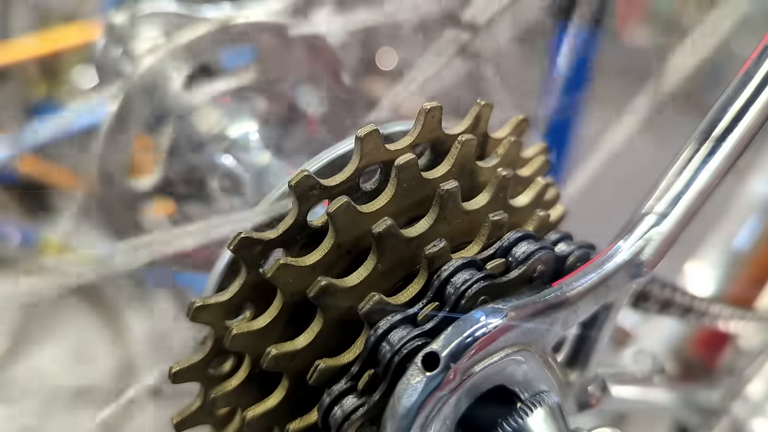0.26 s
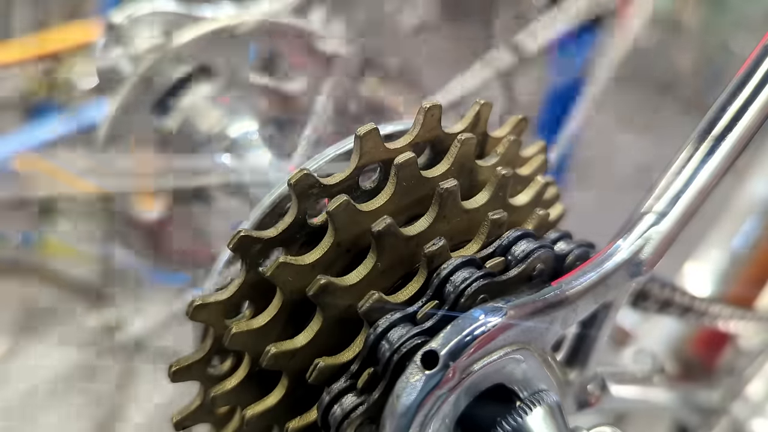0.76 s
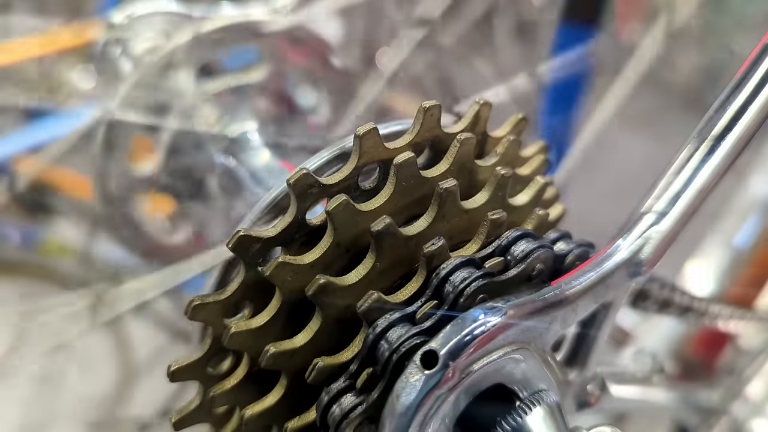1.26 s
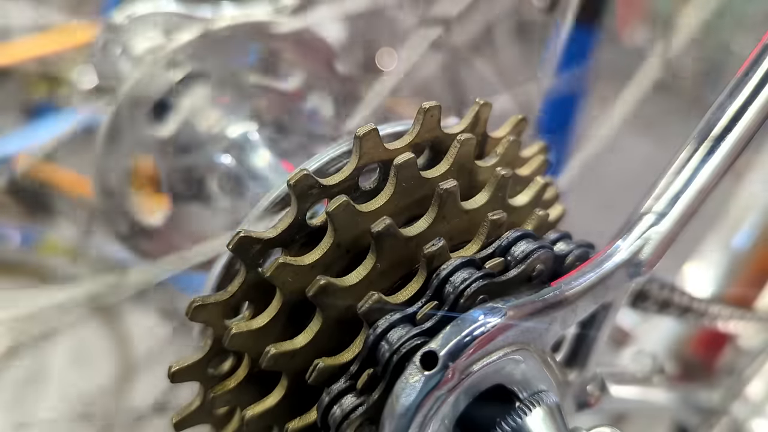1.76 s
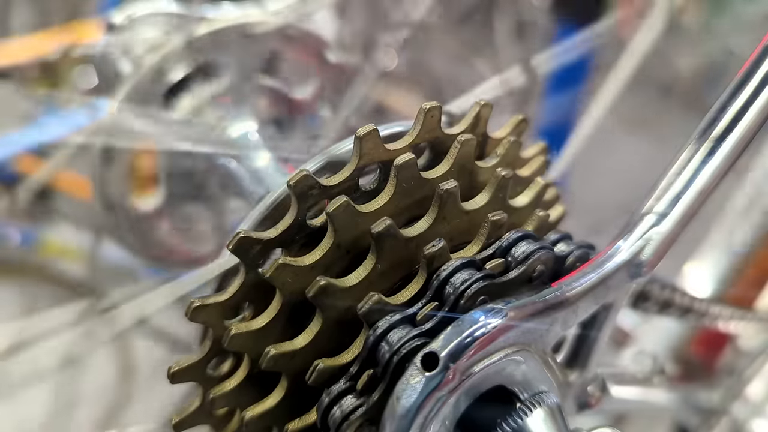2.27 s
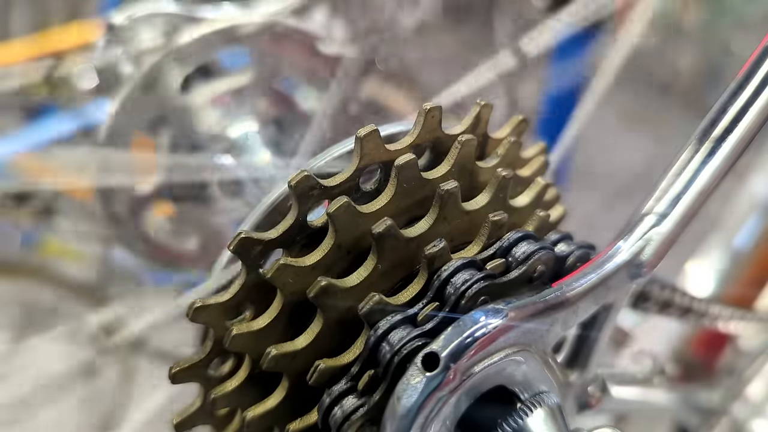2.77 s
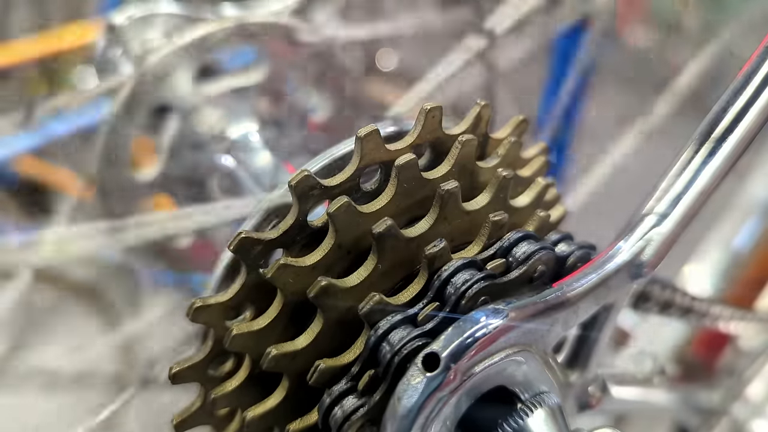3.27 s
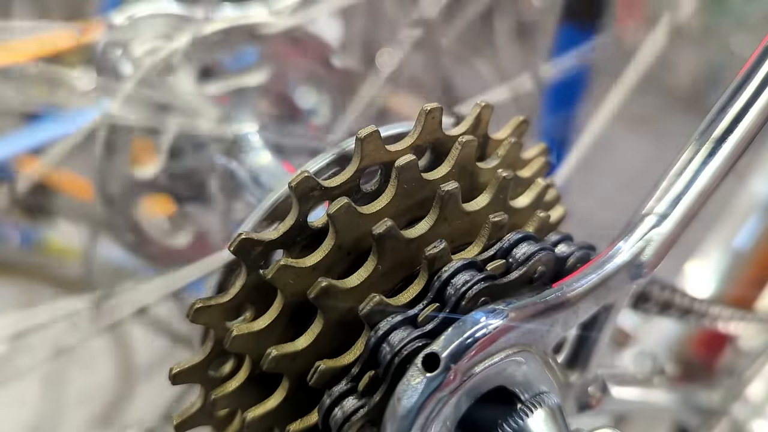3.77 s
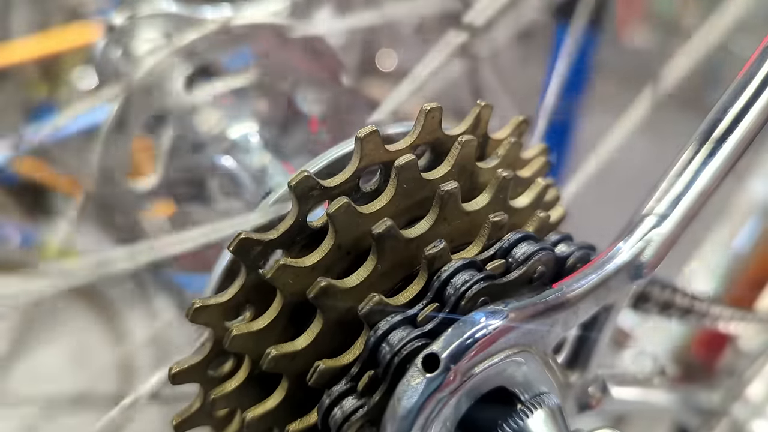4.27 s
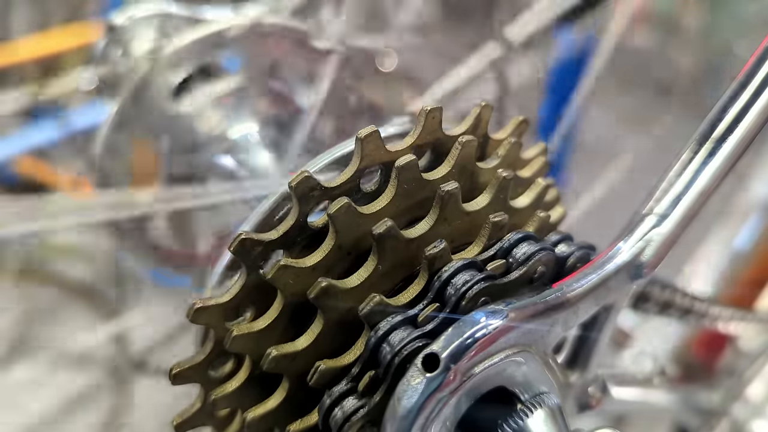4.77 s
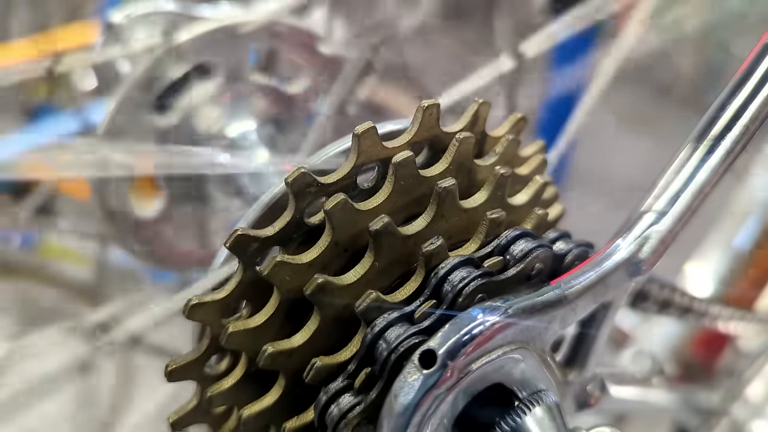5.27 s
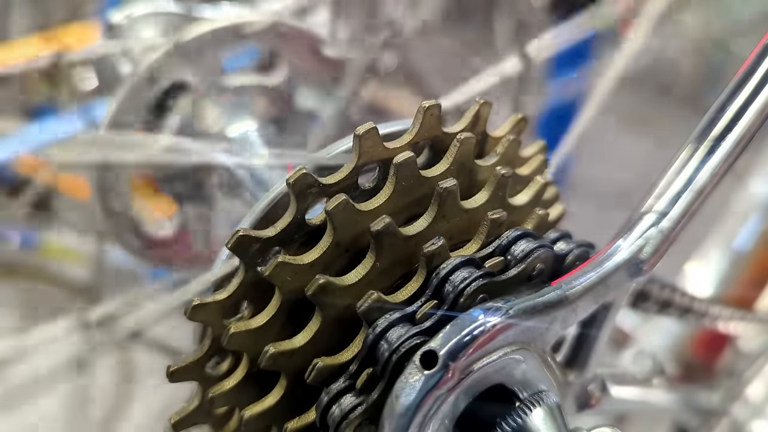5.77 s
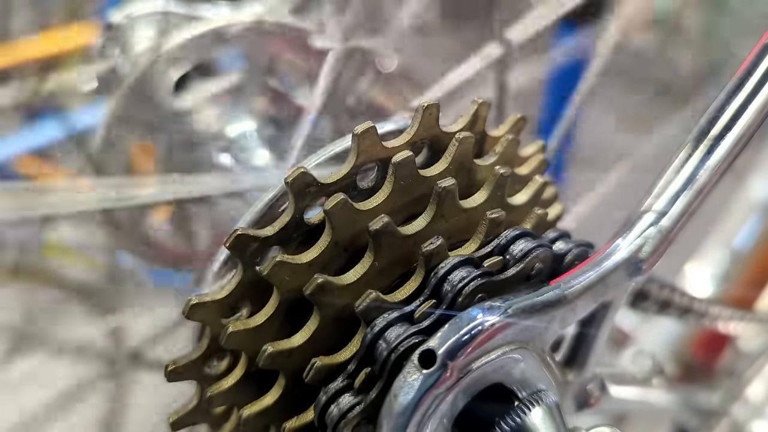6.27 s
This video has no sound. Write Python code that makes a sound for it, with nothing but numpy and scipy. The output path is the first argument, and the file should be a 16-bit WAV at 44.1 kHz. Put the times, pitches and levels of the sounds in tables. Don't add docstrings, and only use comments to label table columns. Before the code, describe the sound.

Close, crisp ratchet clicks from a coasting bike wheel run together in a steel buzz, slowing steadily above quiet workshop air.

```python
import sys
import numpy as np
from scipy import signal
from scipy.fft import rfft, irfft, next_fast_len
from scipy.io import wavfile
from scipy.ndimage import uniform_filter1d, map_coordinates

SR = 44100
rng = np.random.default_rng(int(sys.argv[2]) if len(sys.argv) > 2 else 0)


def output_pcm(signal):
    pcm = np.clip(np.atleast_2d(signal).T, -1, 1) * 32767
    wavfile.write(sys.argv[1], SR, np.round(pcm).astype(np.int16))


def natural_amplitude(level_db):
    exponent = np.asarray(level_db, float) / 20
    return 10 ** exponent


N = 287179
TEETH = 21
# (frequency [Hz], left-right correlation [1])
PORT_LIKENESS = [(60, 0.63), (300, 0.99), (500, 0.034), (5000, 0.06)]


def unit(x):
    return x / np.sqrt(np.mean(x ** 2) + 1e-20)


def along(points, hz):
    point_hz, value = np.transpose(points)
    return np.interp(np.log(hz + 1), np.log(point_hz + 1), value)


def spectrum(points):
    return lambda hz: natural_amplitude(along(points, hz))


def filtered(x, response):
    m = next_fast_len(N + SR // 2)
    return irfft(rfft(x, m) * response(np.fft.rfftfreq(m, 1 / SR)), m)[..., :N]


def resonance(hz, centre_hz, width_hz):
    return 1j * hz * width_hz / (centre_hz ** 2 - hz ** 2 + 1j * hz * width_hz)


def rush(response, likeness, patchy_db, window=512):
    z = signal.stft(rng.standard_normal((2, N)), nperseg=window)[2]
    patches = uniform_filter1d(rng.standard_normal(z.shape[1:]), 4, 0)
    patches = unit(uniform_filter1d(patches, 3, 1))
    pair = signal.istft(z * natural_amplitude(patchy_db * patches), nperseg=window)[1][:, :N]

    def mid_side(hz):
        turn = np.arccos(np.clip(along(likeness, hz), -1, 1)) / 2
        return response(hz) * np.array([np.cos(turn), np.sin(turn)])

    mid, side = filtered(pair, mid_side)
    return unit(np.array([mid + side, mid - side]))


def room_air():
    # (frequency [Hz], level [dB])
    air_points = [(15, -60), (38, -24), (55, -12), (180, -15), (400, -10), (700, -7.5), (1000, -8.5),
                  (2000, -16), (5000, -4.5), (11000, -120)]
    return rush(spectrum(air_points), PORT_LIKENESS, patchy_db=.4, window=1024)


def wheel_whir():
    # (frequency [Hz], width [Hz], level [dB])
    whir_modes = [(134, 7.3, -10.5), (220, 15, -17), (282, 33, -9), (676, 37, -6), (815, 86, 2.3),
                  (1584, 145, -5), (2035, 63, -1.5)]

    def response(hz):
        return sum(natural_amplitude(db) * abs(resonance(hz, c, w)) ** 2 for c, w, db in whir_modes)

    return natural_amplitude([[1.2], [-1.2]]) * rush(response, PORT_LIKENESS, patchy_db=1.8, window=2048)


def low_hum(t):
    # (time [s], level [dB])
    hum_levels = [(0.0, -81), (0.42, -64), (0.65, -82), (0.76, -65), (0.92, -79), (1.57, -63), (1.66, -87),
                  (1.94, -69.5), (2.9, -78), (3.46, -67), (3.95, -79), (4.04, -75), (5.76, -77),
                  (6.08, -60.5), (6.5, -61)]
    drift_rad = 0.55 * map_coordinates(rng.standard_normal(40), [4 * t])
    level_db = np.interp(t, *np.transpose(hum_levels)) - 1.0
    return natural_amplitude(level_db) * np.sin(2 * np.pi * 77.7 * t + drift_rad)


def workshop():
    # (time [s], air level [dB], whir level [dB])
    background = [
        (0.0, -78, -57),
        (0.03, -62, -56.5),
        (1.32, -62.5, -60),
        (6.03, -67, -63),
        (6.41, -67, -68),
        (6.501, -60.5, -67),
    ]
    t = np.arange(N) / SR
    s, air_db, whir_db = np.transpose(background)
    air = natural_amplitude(np.interp(t, s, air_db) + 10.5) * room_air()
    whir = natural_amplitude(np.interp(t, s, whir_db) + 4.5) * wheel_whir()
    return air + whir + low_hum(t)


def landings():
    # (time [s], rate [teeth/s])
    tooth_rate = [(0, 26.083), (.59, 25.046), (1.19, 24.438), (1.78, 23.3), (2.37, 22.647), (2.96, 21.921),
                  (3.56, 21.128), (4.15, 20.531), (4.74, 19.696), (5.33, 19.1), (5.93, 18.371),
                  (6.52, 17.857)]
    # (hard blow [dB], its bounces [dB], flat blow [dB], its bounces [dB])
    tooth_wear = [(-1.6, 5, 3, -6), (-0.1, 3.5, 1.4, -2), (-2.5, 5.5, 0, 1), (-1.8, 6.8, 1.2, -1),
                  (-3.1, 8.5, 0.2, 0.5), (-2.5, 8, 0.1, 0.5), (-0.8, 5.5, 0.4, -1), (2, -1, 1.9, -4),
                  (1.6, -1, -3, 4.5), (-2, -1, 2, -3), (0.3, -.7, 1.5, -1), (.7, -1, -0.7, 1.9),
                  (-1.5, 3, -0.7, 0), (-2.4, 6.5, -0.6, .5), (0.9, 1.2, 0.2, -3.5), (-0.4, 5.5, 0.3, -6.5),
                  (0.2, 3.7, 2, -2.5), (-0.7, 6.5, 0, 2.2), (-.2, 1, 0.8, -4), (0.7, 3, -0.5, -6),
                  (-1, 3.5, 2, -3.2)]
    start_tooth, seat_gap_teeth, gap_growth = .0455, .61, .00007
    graze_lead_s, jitter_s = .0008, .0002
    hard_db, hard_bounce_db, hard_delay_s = -19.5, -7, .0006
    flat_db, flat_bounce_db, flat_delay_s = -21.5, -2.1, .0017
    blow_scatter_db, bounce_scatter_db = 0.32, 1.82

    t = np.arange(N) / SR
    passed = start_tooth + np.cumsum(np.interp(t, *np.transpose(tooth_rate))) / SR
    tooth, flat = np.divmod(np.arange(2 * int(passed[-1]) + 1), 2)
    luck = rng.standard_normal((len(tooth), 3))
    seat = tooth + flat * (seat_gap_teeth + gap_growth * tooth)
    s = np.interp(seat, passed, t) - graze_lead_s + jitter_s * luck[:, 0]
    wear = np.array(tooth_wear)[tooth % TEETH]
    blow_db = np.where(flat, flat_db + wear[:, 2], hard_db + wear[:, 0])
    blow_db = blow_db + blow_scatter_db * luck[:, 1]
    bounce_db = np.where(flat, flat_bounce_db + wear[:, 3], hard_bounce_db + wear[:, 1])
    bounce_db = bounce_db + bounce_scatter_db * luck[:, 2]
    delay_s = np.where(flat, flat_delay_s, hard_delay_s)
    return np.array([s, blow_db, bounce_db, delay_s])[:, :, None]


def contacts(count=10):
    s, blow_db, bounce_db, delay_s = landings()
    chance = rng.random((len(s), 3, count))
    order = np.arange(count)
    graze, blow, bounce = order == 0, order == 1, order > 1
    wait_s = blow * delay_s * chance[:, 0] + bounce * (.0007 + .0018 * chance[:, 0])
    late_s = np.cumsum(wait_s, 1)
    share = bounce * natural_amplitude(-700 * late_s + 9.1 * chance[:, 1])
    share = share / np.linalg.norm(share, axis=1, keepdims=True)
    size = natural_amplitude(blow_db) * (natural_amplitude(-8.0) * graze + blow + natural_amplitude(bounce_db + 3.0) * share)
    index = np.clip(np.round((s + .0001 + late_s) * SR).astype(int), 0, N - 1)
    return index, size * np.where(chance[:, 2] < .5, 1, -1)


def dying(index, size, t60_s, rise_s):
    t = np.arange(SR // 8) / SR
    shape = natural_amplitude(-60 * t / t60_s) * (1 - np.exp(-t / rise_s))
    power = np.bincount(index.ravel(), size.ravel() ** 2, N)
    return np.sqrt(abs(signal.fftconvolve(power, shape ** 2)[:N]))


def grip(index, after_s, depth_db):
    landed = np.maximum.accumulate(np.bincount(index[:, 0], index[:, 0], N))
    since_s = (np.arange(N) - landed) / SR
    return natural_amplitude(-depth_db / (1 + np.exp((after_s - since_s) / 0.0025)))


def shell_and_bench(index, size):
    # (frequency [Hz], level [dB per Hz])
    shell_points = [(350, -30.5), (700, -19.5), (1200, -21.5), (3200, -14.5), (8000, -7), (16500, -14.5)]
    noise = rush(spectrum(shell_points), [(1000, 0.0081)], patchy_db=2.5, window=256)
    choke = grip(index, after_s=0.013, depth_db=2.95)
    return natural_amplitude(-16) * choke * dying(index, size, t60_s=0.23, rise_s=0.0013) * noise


def dull_tick(index, size):
    # (frequency [Hz], level [dB per Hz])
    knock_points = [(500, -36), (900, -11), (2000, 3.8), (3500, -11.5), (6000, -10.5)]
    noise = rush(spectrum(knock_points), [(1500, 0.17)], patchy_db=2.5, window=256)
    return natural_amplitude(-21) * dying(index, size, t60_s=0.0088, rise_s=0.00011) * noise


def crack_and_scrape(index, size):
    # (frequency [Hz], level [dB per Hz])
    crack_points = [(500, -39.5), (900, -26), (3300, -19.5), (3900, -9.5), (5400, -11), (8000, -4.5),
                    (13500, -5), (15500, -4.5)]
    noise = rush(spectrum(crack_points), [(1500, 0.12), (6000, 0.043)], patchy_db=0.5, window=256)
    crack = dying(index, size, t60_s=0.016, rise_s=0.0003)
    scrape = dying(N - 1 - index[:, 0], size[:, 1], t60_s=0.02, rise_s=.0001)[::-1]
    return (natural_amplitude(1.5) * crack + natural_amplitude(-13) * scrape) * noise


def sprockets(index, size):
    # (frequency [Hz], left lead [rad], lobes around the ratchet [1], lobe angle [rad])
    sprocket_modes = [(3600, 2.6, 1, 1.1), (5775, -.7, 6, 2.3), (6210, -2.9, 6, 2.3), (6410, -2.8, 6, 2.3),
                      (7480, -.2, 4, .2), (8620, .3, 4, 0), (8900, 1.5, 4, 0), (9320, 1.8, 6, 2.9),
                      (10020, -.1, 2, -1.6), (10700, -.8, 1, .6), (11050, 1.7, 1, .6), (11260, 1.6, 1, .6),
                      (11630, -2.6, 6, .6), (11980, .6, 6, 1.1), (12760, 2.1, 8, -.4), (13270, -1.4, 1, .1),
                      (13900, -.7, 2, 1.8), (14680, -.4, 3, 2.7)]
    # (t60 [s], level [dB], left-right [dB], phase gap within the trio [rad])
    mode_ringing = [(0.034, -24, 1.5, 0.27), (0.069, -22, -3, 1.7), (0.078, -20, -3, 0.93),
                    (0.033, -14.5, -6, 0.61), (0.022, -12.5, 5.5, 1.36), (0.027, -9, 2, 1.34),
                    (0.049, -15, 5.5, 2), (0.025, -14, -3, 1.1), (0.023, -11.5, -7.5, 1.24),
                    (0.029, -16, 14, 1.5), (0.048, -9.5, -0.5, 1.1), (0.079, -15.5, 0, .8),
                    (0.065, -14.5, 6.5, 1.3), (0.027, -23, -10, 1), (0.066, -10.5, -1.5, 0.43),
                    (0.041, -17, -1, 1.3), (0.023, -16, 7, 1.4), (0.023, -10.5, -3, 0.98)]
    lobe_db, landing_db, seat_db, contact_db = 3, 1.38, 2.0, 1.38
    split_widths = 1.17

    k = np.arange(len(index))[:, None]
    angle = 2 * np.pi * ((k + 1) // 2) / TEETH + (k % 2 == 0) * (np.pi + .08)
    m = next_fast_len(N + SR // 2)
    f = np.fft.rfftfreq(m, 1 / SR)
    sides = np.array([[1], [-1]])
    out = np.zeros((2, len(f)), complex)
    for (hz, lead, lobes, turn), (t60_s, db, pan_db, gap) in zip(sprocket_modes, mode_ringing):
        mode_db = db + lobe_db * np.cos(lobes * angle + turn)
        mode_db = mode_db + landing_db * rng.standard_normal(k.shape)
        mode_db = mode_db + seat_db * rng.standard_normal(2 * TEETH)[k % (2 * TEETH)]
        width_hz = np.log(1000) / (np.pi * t60_s)
        for way in (-1, 0, 1):
            ports = natural_amplitude(sides * pan_db / 2) * np.exp(.5j * (lead + way * gap) * sides)
            strength = natural_amplitude(mode_db + contact_db * rng.standard_normal(size.shape))
            strength = strength * rng.choice([-1, 1], k.shape)
            blows = np.bincount(index.ravel(), (size * strength).ravel(), N)
            ring = resonance(f, hz + way * split_widths * width_hz, width_hz)
            ring = ring * SR / (np.pi * width_hz)
            out += ports * ring * rfft(blows, m)
    return irfft(out, m)[:, :N]


def ratchet():
    index, size = contacts()
    ring = natural_amplitude(-10.0) * grip(index, after_s=0.0094, depth_db=3.0) * sprockets(index, size)
    noises = shell_and_bench(index, size) + dull_tick(index, size) + crack_and_scrape(index, size)
    return noises + ring


def scene():
    return workshop() + ratchet() * natural_amplitude([[.4], [-.4]])


def roll_off(x):
    return signal.sosfilt(signal.butter(12, 16990, fs=SR, output="sos"), x)


def record(dry):
    mix = filtered(dry, lambda hz: np.clip((15880 - hz) / 200, 0, 1))
    return roll_off(mix)


dry = scene()
out = record(dry)
output_pcm(out)
```